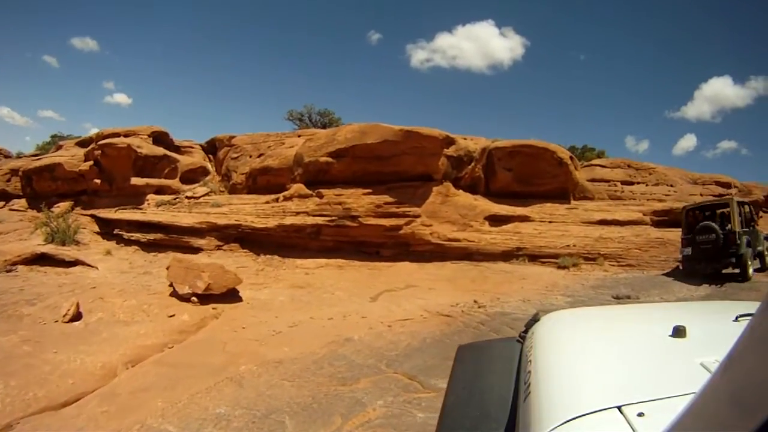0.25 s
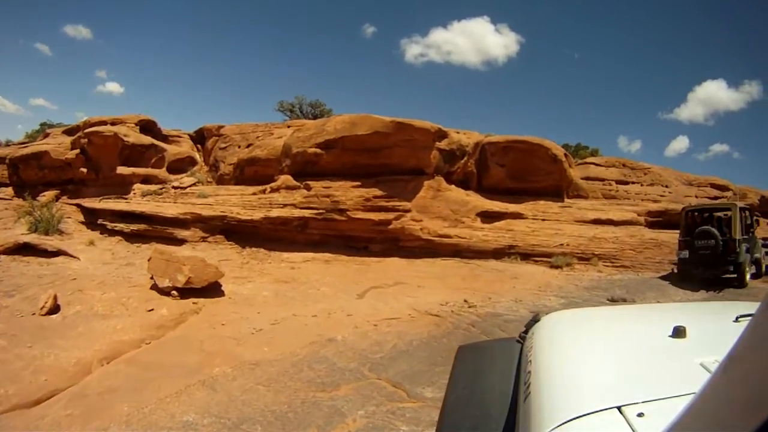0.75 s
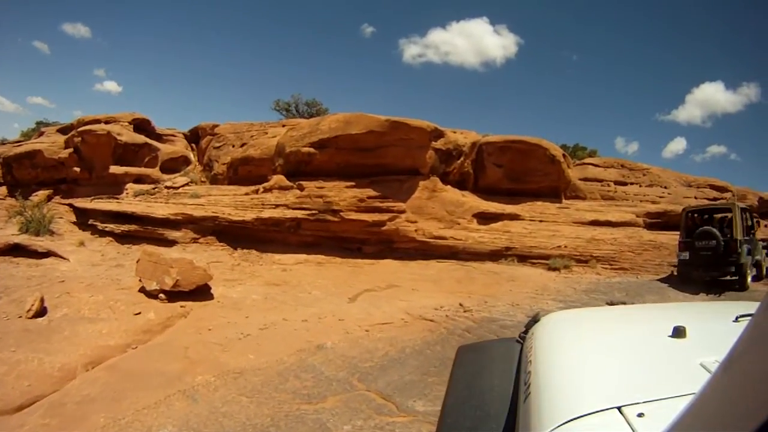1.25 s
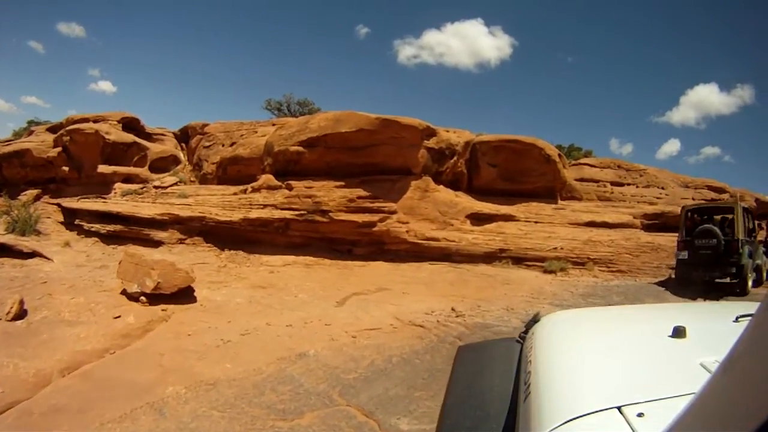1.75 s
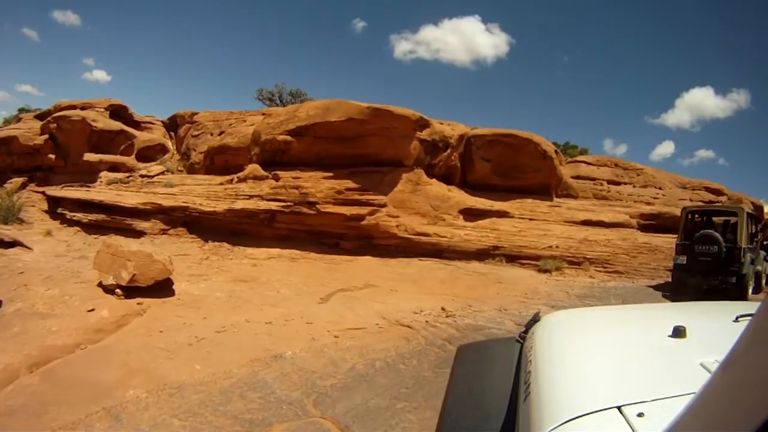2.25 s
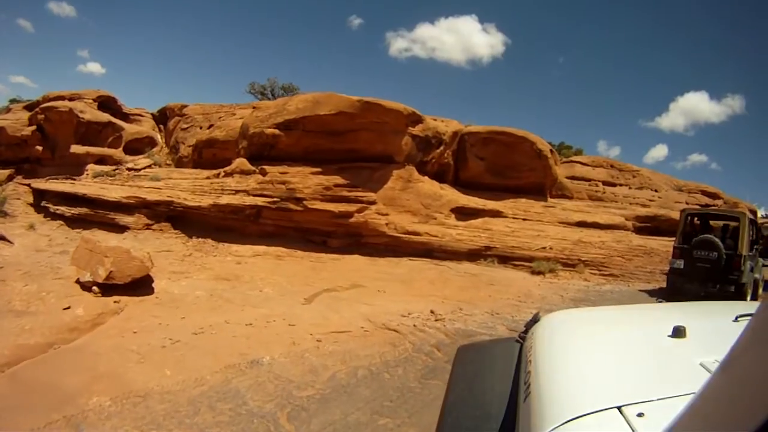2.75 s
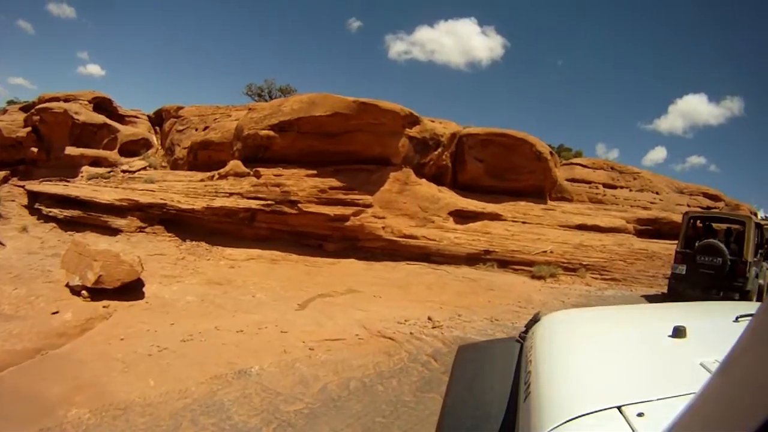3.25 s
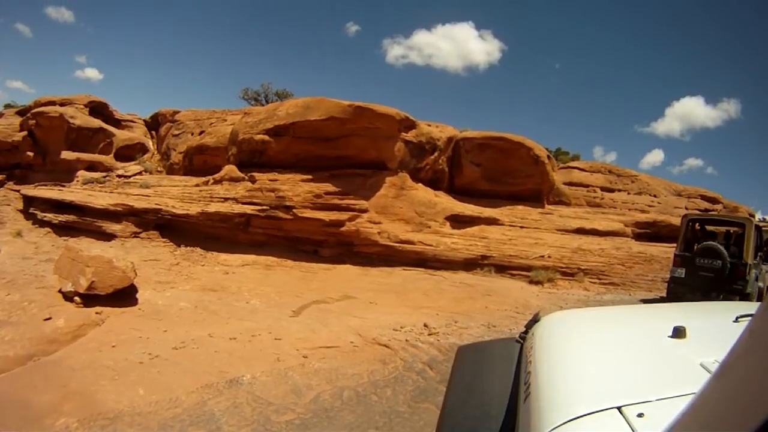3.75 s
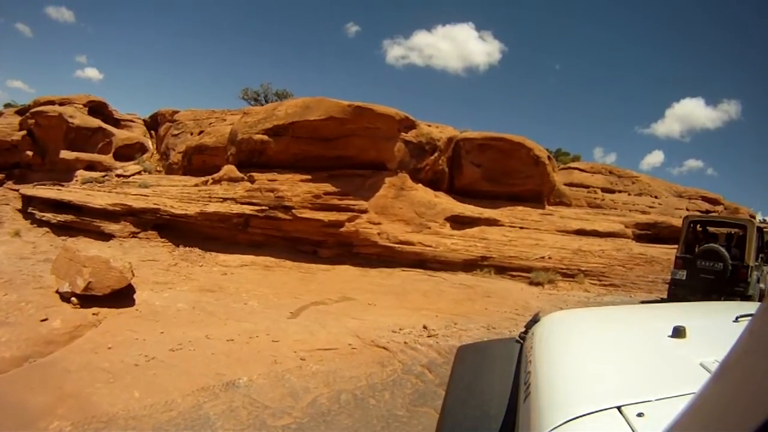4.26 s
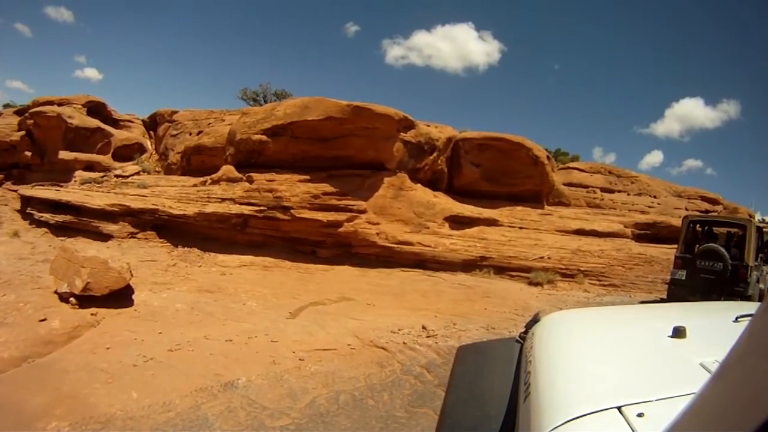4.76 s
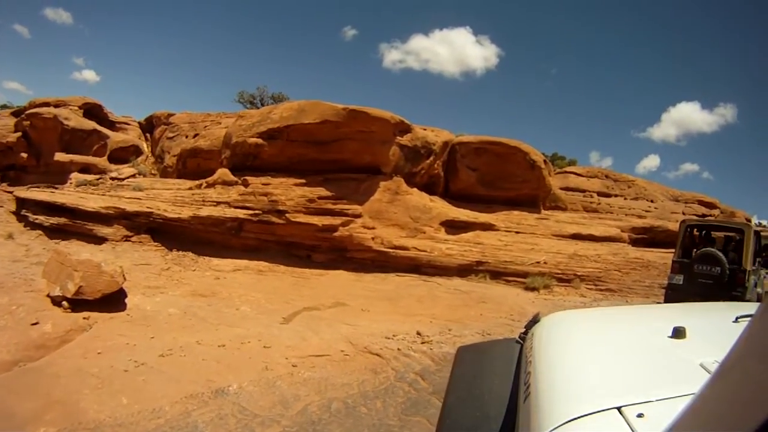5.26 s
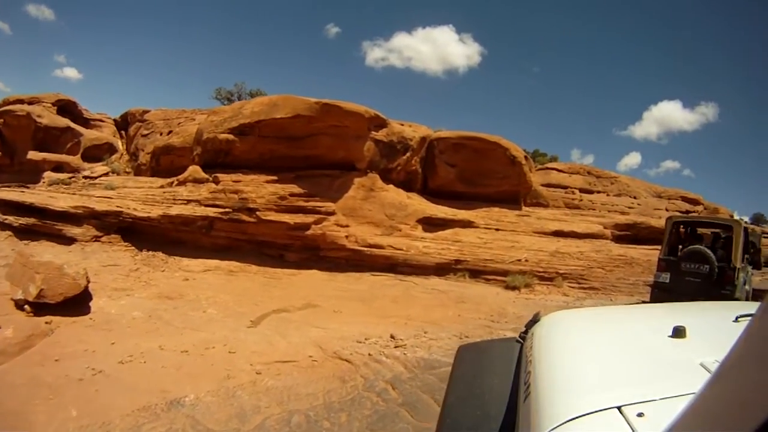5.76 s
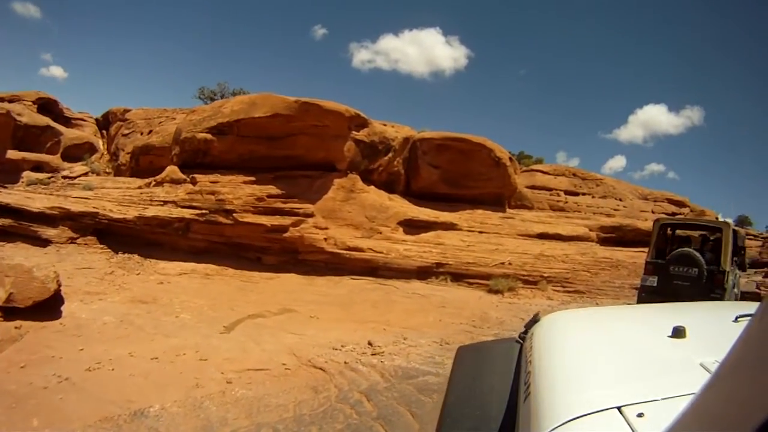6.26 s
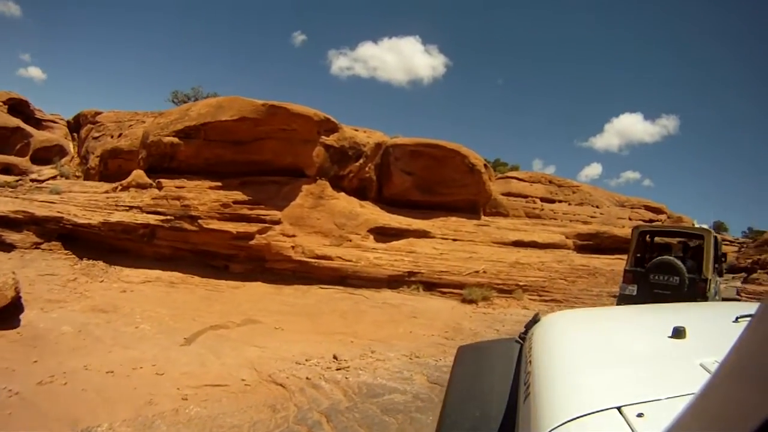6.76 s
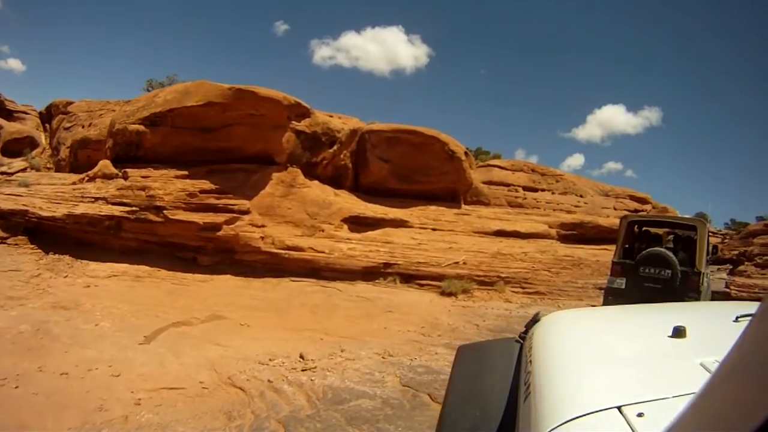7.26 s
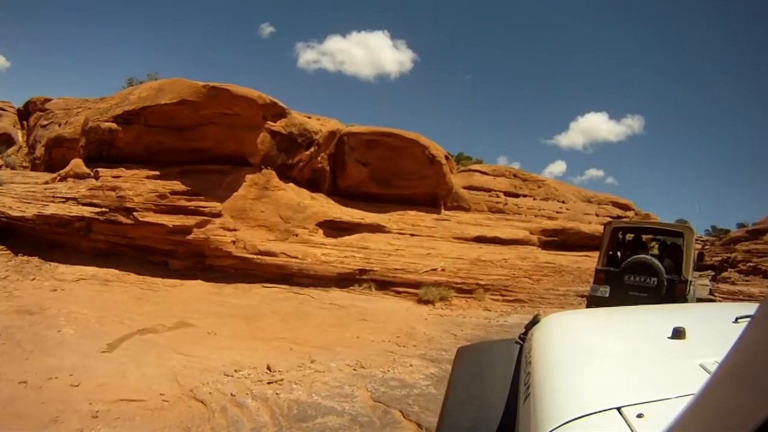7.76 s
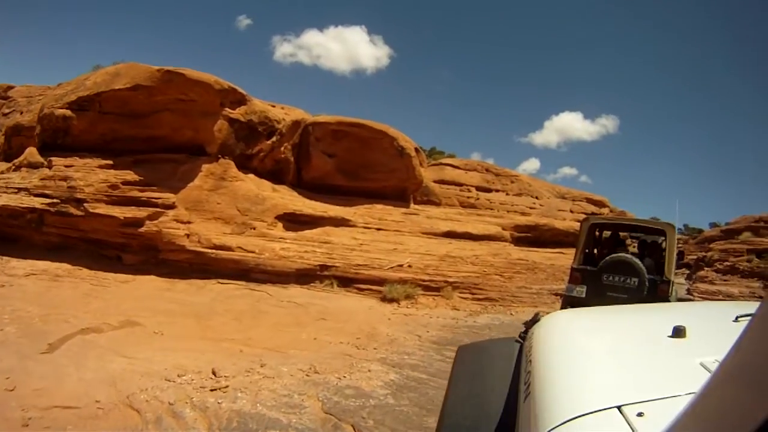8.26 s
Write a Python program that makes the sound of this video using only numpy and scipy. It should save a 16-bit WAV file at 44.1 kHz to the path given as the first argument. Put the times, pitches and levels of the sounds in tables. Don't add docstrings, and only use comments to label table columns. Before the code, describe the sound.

Muffled low rumble dominates: engine pulses around 45 hertz, rising and falling unevenly as the car lurches. A brief high rubber squeak opens, a click and creak follow around 1.5 seconds, and sparse ticks continue. From about 6 seconds, heavier throbbing jolts, low gear moan and deep gusts crowd together, then ease. Faint hiss and gritty tyre scrub sit far behind. Close body-mounted microphone outdoors, boxy and without reverberation.

```python
import sys
import numpy as np
from scipy import signal
from scipy.fft import rfft, irfft, next_fast_len
from scipy.io import wavfile
from scipy.ndimage import uniform_filter1d

SR = 44100
rng = np.random.default_rng(int(sys.argv[2]) if len(sys.argv) > 2 else 0)


def level_to_linear(level):
    exponent = np.asarray(level, float) / 20
    return 10 ** exponent


def log_audio(samples):
    frames = np.atleast_2d(samples).T
    limited = np.clip(frames, -1, 1)
    pcm = np.round(limited * 32767).astype(np.int16)
    wavfile.write(sys.argv[1], SR, pcm)


N = 375732
T = np.arange(N) / SR
FFT_SIZE = next_fast_len(N)

# time_s, pitch_hz
FIRING = [(0, 48.27), (.45, 44.84), (.8, 43.44), (1.1, 45.4), (1.35, 45.93), (1.6, 47.15), (1.95, 46.64),
          (2.3, 43.97), (2.9, 45.15), (3.1, 44.16), (3.3, 40.9), (3.7, 41.3), (4.0, 42.33), (4.3, 43.92),
          (4.5, 41.07), (4.73, 41.26), (4.94, 45.35), (5.05, 45.86), (5.25, 46.2), (5.75, 50.3), (6, 45.7),
          (8.52, 46.21)]
# peak_s, level_db, rise_s, fall_s
LURCHES = [(0.0, -38, .1, 0.32), (0.47, -31, 0.27, 0.21), (1.3, -28.5, 0.74, 0.27), (1.56, -36, .06, .08),
           (1.78, -42.5, 0.75, 0.19), (2.1, -33, 0.25, 0.46), (2.92, -28, 0.66, 0.44),
           (3.34, -36.5, 0.09, 0.1), (3.55, -36, 0.14, 0.2), (3.94, -32, 0.25, 0.22),
           (4.27, -30, 0.28, .25), (4.58, -37, 0.094, 0.18), (4.95, -27, 0.2, 0.27),
           (5.17, -31, 0.083, 0.21), (5.8, -36.5, 0.075, 0.082), (6.07, -30, 0.2, 0.16),
           (6.32, -25.5, 0.27, 0.18), (6.52, -27.5, 0.096, 0.086), (6.9, -37.5, 0.19, 0.16),
           (7.13, -45, 0.073, 0.062), (7.4, -30, 0.22, 0.15), (8.24, -37, 0.089, 0.099),
           (8.5, -39.5, 0.058, .1)]
# multiple_of_firing, climbing_db, over_the_ledge_db
BOOM_MULTIPLES = [(1.56, -24, -22), (3, -28, -28), (3.5, -42, -60), (4.3, -30, -44), (5, -31, -34.5),
                  (7.1, -41, -44.5)]
# centre_s, depth_db, half_length_s
SLACK_DIPS = [(0.102, -9.5, 0.054), (0.673, -28, 0.054), (1.68, -11, 0.04), (1.807, -5, 0.035),
              (3.22, -15, 0.086), (3.435, -18, 0.049), (5.114, -9, 0.027), (5.742, -11, 0.029),
              (5.87, -10, 0.032), (6.408, -9, .015), (7.046, -18.5, 0.017), (7.762, -11, .04),
              (8.28, -2, 0.05)]
# peak_s, level_db, rise_s, fall_s
LOW_JOLTS = [
    (0.0, -40.5, .1, 0.11),
    (.35, -69, 0.085, 0.29),
    (5.36, -27, 0.27, 0.44),
    (6.46, -25.5, 0.042, 0.063),
    (6.78, -29, 0.056, 0.079),
    (7.0, -28.5, 0.063, 0.059),
    (7.6, -25.5, 0.095, 0.11),
    (7.84, -31.5, 0.038, 0.042),
    (8.22, -44, 0.061, 0.097),
]
# peak_s, level_db, rise_s, fall_s
HIGH_JOLTS = [(.15, -47, .15, .12), (.85, -48, .1, .1), (3.35, -48, .1, .12), (.33, -40.5, 0.063, 0.17),
              (1.14, -49, 0.06, .05), (2.95, -47, 0.2, 0.29), (4.22, -48, 0.1, 0.2), (6.2, -39, 0.23, .3),
              (6.67, -24.5, 0.077, 0.061), (6.89, -26, 0.058, 0.061), (7.12, -34, 0.06, 0.06),
              (7.71, -36, 0.033, 0.079), (7.89, -27, 0.062, 0.089), (8.041, -29, 0.1, 0.17),
              (8.41, -29.5, 0.039, 0.057)]
# time_s, above_rest_hz
HIGH_MODE_LIFT = [(6.0, 0), (6.15, 5), (6.4, 0), (8.25, 0), (8.35, 7)]
# time_s, pitch_hz
MOAN_PITCH = [(1.5, 161), (2, 155.2), (4.5, 119.7), (4.8, 124.5), (5.2, 110.6), (5.48, 124.2),
              (5.81, 149.2), (6, 141.8), (6.8, 150.9), (7.15, 149.7), (7.4, 139.2), (7.75, 134.2),
              (7.95, 147.6), (8.52, 151.3)]
# peak_s, level_db, rise_s, fall_s
MOAN_SWELLS = [
    (1.65, -69, 0.21, 0.29),
    (4.62, -69, .15, 0.12),
    (5.35, -57, 0.088, 0.082),
    (5.81, -55, 0.3, 0.22),
    (6.1, -66, .15, 0.46),
    (6.72, -52, 0.07, 0.064),
    (7.15, -50.5, 0.34, 0.36),
    (7.59, -55, 0.18, .12),
    (7.92, -58.5, 0.19, 0.21),
    (8.5, -55.5, 0.2, .1),
]
# centre_s, level_db, pitch_hz, half_length_s
SQUEAK = [(0.118, -47, 1615, 0.0093), (0.134, -52, 1670, 0.016), (0.152, -47, 1646, 0.022),
          (.168, -58, 1587, .01), (.183, -48, 1664, 0.019), (0.202, -42.5, 1620, 0.025),
          (.22, -45, 1573, 0.015), (0.238, -40.5, 1592, 0.014), (0.259, -47.5, 1630, 0.014),
          (.277, -54.5, 1597, 0.017), (0.295, -65, 1594, 0.018), (0.324, -65, 1574, 0.016),
          (0.35, -62, 1600, 0.016), (.375, -69, 1590, 0.022), (0.397, -63, 1735, 0.02),
          (0.419, -49.5, 1656, 0.02), (.455, -69, 1665, 0.036), (.49, -71, 1650, .025)]
# centre_s, level_db, pitch_hz, half_length_s
SQUEAK_TIGHT = [
    (0.136, -61, 3380, 0.034),
    (0.169, -60, 3430, 0.018),
    (.19, -61.5, 3350, 0.018),
    (0.209, -58, 3430, 0.011),
    (0.225, -60, 3380, .014),
    (0.407, -59.5, 3400, 0.024),
]
# centre_s, level_db, pitch_hz, half_length_s
SQUEAK_SLACK = [
    (.208, -59, 3016, 0.015),
    (.222, -57, 3280, 0.021),
    (0.238, -50.5, 3090, 0.01),
    (.253, -59, 3170, 0.014),
    (.275, -66, 3150, 0.015),
    (.293, -67, 3170, .014),
    (.308, -70, 3100, .008),
]
# centre_s, level_db, voice_hz, half_length_s
TIGHT_OVERTONE_SLIPS = [
    (.165, -65, 3410, 0.029),
    (.207, -63, 3450, .011),
]
# centre_s, level_db
PIPS = [(0.325, -64), (0.428, -61.5), (2.348, -63), (2.578, -59.5), (2.781, -67), (2.845, -52), (2.93, -64),
        (4.945, -67), (6.353, -69), (6.501, -69), (7.137, -63.5), (7.807, -65)]
# centre_s, level_db, pitch_hz, half_length_s
CREAKS = [(.21, -49, 1473, .012), (0.21, -60, 1950, 0.0089), (0.225, -67, 3680, .01),
          (0.368, -72, 2460, .022), (1.521, -53, 1035, 0.0056), (1.525, -62.5, 3070, 0.025),
          (1.515, -60, 3000, .005), (1.539, -58, 1006, 0.016), (2.062, -70.5, 3710, 0.02),
          (2.144, -73, 3680, 0.03), (2.435, -67, 2132, 0.016), (4.392, -74, 3720, 0.048),
          (4.439, -70, 1503, 0.03), (4.573, -66.5, 1580, 0.044), (4.752, -63, 1560, 0.012),
          (4.768, -70, 1954, 0.035), (5.036, -75, 1545, .026), (5.269, -71, 1538, 0.029),
          (6.63, -64, 1080, 0.017), (0.168, -72, 2430, .02), (0.314, -71, 2280, .015),
          (.385, -69, 2410, .015), (.41, -68, 2190, 0.019), (.402, -73, 5200, .012),
          (1.553, -60, 1074, .015), (1.572, -67, 1031, .02), (4.28, -68, 1530, 0.046),
          (4.75, -66, 1340, 0.013), (4.78, -69, 1910, 0.02), (4.758, -71, 3500, .012),
          (4.79, -71, 4100, .015), (4.295, -70, 3750, .015), (2.86, -69.5, 1080, 0.044),
          (2.57, -68, 2300, .012)]
# time_s, scrub_db
SCRUB = [(0, -68), (.6, -74), (1.7, -72), (2.5, -73), (3.1, -70), (3.7, -74), (4.2, -73.5), (4.65, -67),
         (4.85, -69.5), (5, -65), (5.2, -68), (5.9, -68.5), (6.5, -65.5), (7.2, -66.5), (7.85, -64.5),
         (8.1, -68), (8.52, -70.5)]
# pitch_hz, width_hz, level_db
SHELL_MODES = [(1538, 110, -7.5), (1947, 95, -5), (2200, 176, -0.5), (2474, 156, -3.5), (3073, 100, -10),
               (3430, 200, -15.5), (3700, 133, -9.5)]
# start_s, level_db, decay_s, panel_share_db
KNOCKS = [(1.512, -58.5, 0.09, -5), (2.563, -61, 0.03, -1), (2.822, -62, 0.027, -10),
          (3.227, -60, 0.034, -6), (3.295, -66, 0.083, 3), (4.264, -60, 0.2, -9),
          (4.748, -61.5, 0.13, -6.5), (5.736, -60, 0.035, -12), (5.87, -63, 0.059, -3),
          (6.021, -68, 0.044, -8), (6.659, -67, 0.07, 2), (7.03, -72, 0.075, 4), (7.08, -67.5, 0.095, 4),
          (7.3, -78, 0.041, -7), (7.84, -79, 0.05, 0), (7.964, -64, 0.039, -10)]
# peak_s, level_db, rise_s, fall_s
PANEL_RATTLES = [
    (6.5, -79.5, 0.31, .15),
    (6.95, -70, .2, 0.24),
    (7.5, -71.5, 0.59, 0.46),
]
# start_s, peak_db, pitch_hz
TICKS = [(1.5124, -52, 1900), (1.5194, -55, 2080), (1.5379, -49, 2300), (1.5484, -51, 2280),
         (4.2642, -51, 2420), (4.2794, -58, 2168), (4.2944, -46, 2160), (4.3264, -47, 2101),
         (4.7486, -60, 2130), (4.7644, -52, 2236), (4.7844, -48, 2280), (4.9267, -49, 2255),
         (5.3732, -48, 2291), (6.3704, -46, 2260), (6.4921, -54.5, 2250), (6.573, -54, 2466),
         (6.5979, -52, 2033), (6.6149, -54, 2000), (6.6583, -50, 2470), (6.6882, -48, 2160),
         (6.7024, -56, 2150), (7.0424, -53, 2191), (7.0843, -51, 2230), (7.4021, -56, 2170),
         (7.5537, -48, 2200), (7.637, -58, 2250), (7.7544, -54, 2240), (7.7917, -52, 2200),
         (7.8336, -52, 2260), (7.8835, -53, 2150), (7.9648, -54, 2405), (8.1544, -47, 2169)]
# start_s, peak_db, pitch_hz
PANEL_TICKS = [
    (1.518, -57, 1035),
    (6.6585, -47, 1075),
    (7.018, -58, 1090),
    (8.16, -61, 1110),
]
# peak_s, level_db, rise_s, fall_s
THUDS = [(3.3, -62, .08, .25), (5.2, -63, .08, .1), (8.3, -64, .1, .15), (.33, -61, 0.037, 0.074),
         (1.95, -65, .08, 0.084), (6.0, -58, 0.042, 0.11), (.45, -67, .04, 0.069), (1.15, -60, .06, 0.14),
         (2.86, -59, .05, 0.072), (4.92, -59, 0.073, .1), (6.22, -60, 0.094, 0.11), (6.47, -62, .06, 0.076),
         (7.46, -64, 0.045, 0.062), (7.6, -73, .08, .15)]
# centre_s, level_db,
# pitch_hz, half_length_s
LOW_TONES = [(.32, -51, 105, .045), (6.45, -55, 105, .07), (.325, -54, 184, .035), (.33, -54, 140, 0.06),
             (.44, -60, 195, .04), (4.92, -60, 227, .08), (4.92, -63.5, 320, .08), (6.1, -61, 224.7, 0.13),
             (7.33, -67, 230, .07), (7.92, -58, 155, .05), (6.7, -56, 150, .04), (6.86, -61, 195, .07),
             (6.3, -61, 175, .08), (1.53, -64, 290, .04), (.8, -66, 335, .04), (2.35, -66, 330, .03),
             (4.05, -67, 325, .06), (3.27, -65, 270, .04), (2.92, -66, 340, .02)]
# centre_s, level_db, pitch_hz, half_length_s
BOUNCE = [
    (3.4, -35.5, 13.17, 0.28),
]
# start_s, length_s, start_hz, climb_hz_per_s, level_db
WHINES = [
    (5.4, .4, 1990, 1400, -75.5),
    (4.35, .08, 3500, 4500, -73),
    (8.17, .24, 1985, -230, -72.5),
    (7.15, .2, 2140, -250, -73),
    (7.68, .2, 2220, 0, -71),
    (7.34, .07, 1060, -200, -69),
    (7.54, .12, 1085, 30, -68),
    (5.52, .16, 368, -170, -67),
]
# pitch_hz, level_db_per_hz
WIND_COLOUR = [(47, -34), (76, -5), (90, -17), (113, -15), (173, -14), (280, -25), (339, -25), (433, -31.5),
               (700, -35.5), (910, -56), (1540, -120)]
# peak_s, level_db, rise_s, fall_s
GUSTS = [
    (2.55, -54, .2, .2),
    (3.06, -52, .1, .15),
    (3.35, -53, 0.17, .2),
    (5.8, -54, .2, 0.15),
    (6.22, -38, .1, .08),
    (6.49, -32, 0.13, 0.11),
    (6.9, -43, 0.5, .25),
    (7.43, -42, 0.16, 0.26),
    (7.85, -42.5, 0.23, 0.42),
    (8.42, -40, .1, 0.088),
]
# pitch_hz, level_db_per_hz
HISS_COLOUR = [(150, -43), (250, -3.5), (459, -11), (770, -10.5), (976, -13.5), (1090, -13), (1360, -15.5),
               (2340, -20.5), (2670, -20), (5170, -21.5), (5900, -28.5), (7670, -72), (13000, -120)]
# from_hz, to_hz, share_of_time_kept
FAINT_BANDS = [(12800, 13900, .45), (13900, 14700, .75), (14700, 15400, .33)]


def rumble():
    (firing_hz,) = curves(FIRING)
    boom_db = swells(LURCHES, rest_db=-42.5)
    full_db = -28
    strain_db = 1.34 * (boom_db - full_db)
    strain_db = strain_db - 6 * ((T > 5.03) & (T < 5.9))
    over_ledge = T > 4.6
    multiples = np.zeros(N)
    for multiple, climbing_db, over_db in BOOM_MULTIPLES:
        db = full_db + np.where(over_ledge, over_db, climbing_db) + strain_db + 2.3 * walk(5)
        multiples += tone(multiple * firing_hz, db, waver=0.0045)
    low_mode = body_mode(LOW_JOLTS, 57.5, rest_db=-54.5, width_hz=10.8)
    high_mode = body_mode(HIGH_JOLTS, 64.7, rest_db=-53, width_hz=12.6, lift_hz=curves(HIGH_MODE_LIFT)[0])
    boom = tone(firing_hz, boom_db, waver=0.0083)
    moan_db = swells(MOAN_SWELLS, rest_db=-90) + 2.2 * walk(12)
    moan = tone(curves(MOAN_PITCH)[0], moan_db, waver=0.013)
    return slack_gain() * (boom + multiples + low_mode + high_mode) + moan


def body_mode(jolts, hz, rest_db, width_hz, lift_hz=0):
    db = swells(jolts, rest_db + 3.5 * walk(6.3))
    steady = np.clip((db + 44) / 8, 0, 1)
    hum = tone(hz + lift_hz, db, waver=0.0054)
    noisy_ring = level_to_linear(db) * rung_noise(hz, width_hz)
    return np.sqrt(steady) * hum + np.sqrt(1 - steady) * noisy_ring


def slack_gain():
    return level_to_linear(sum(db * np.clip(1 - abs(T - s) / half, 0, 1) ** 1.9 for s, db, half in SLACK_DIPS))


def mount():
    squeaks = slide(SQUEAK, rough=0.0074, rasp_db=2.5)
    squeaks += slide(SQUEAK_TIGHT, rough=0.009, rasp_db=3.5)
    squeaks += slide(SQUEAK_SLACK, rough=0.014, rasp_db=3.5)
    squeaks += slide(TIGHT_OVERTONE_SLIPS, rough=0.011, rasp_db=-4.0, multiple=1.51)
    creaks = chirps(CREAKS, rough=0.0126, rasp_db=2.5)
    pips = chirps([(s, db, 749, 0.022) for s, db in PIPS], rough=0.035, rasp_db=2.2)
    nudges = chirps([(s, db - 2.5, 345, 0.022) for s, db in PIPS], rough=0.03, rasp_db=1.4)
    return squeaks + creaks + pips + nudges


def slide(table, rough, rasp_db, multiple=1):
    s, db, hz, length = np.transpose(table)
    span = slice(int((s[0] - length[0]) * SR), int((s[-1] + length[-1]) * SR))
    t = T[span]
    grip = np.zeros(len(t))
    for centre, peak, half in zip(s, level_to_linear(db), length):
        grip += peak * np.cos(np.pi / 2 * np.clip((t - centre) / half, -1, 1)) ** 2
    pitch = multiple * np.interp(t, s, hz) * (1 + rough * walk(250.4)[span])
    rasp = level_to_linear(rasp_db * walk(201)[span])
    out = np.zeros(N)
    out[span] = np.sqrt(2) * grip * rasp * np.sin(2 * np.pi * np.cumsum(pitch) / SR)
    return out


def chirps(table, rough, rasp_db):
    out = np.zeros(N)
    wobble = np.cumsum(walk(250)) / SR
    for s, db, hz, length in table:
        span = slice(int((s - length) * SR), min(int((s + length) * SR), N))
        t = T[span] - s
        swell = np.cos(np.pi * t / length / 2) ** 2
        out[span] += np.sqrt(2) * level_to_linear(db) * swell * np.sin(2 * np.pi * hz * (t + rough * wobble[span]))
    return out * level_to_linear(rasp_db * walk(200))


def shell():
    knock, knock_panel = np.zeros(N), np.zeros(N)
    for s, db, decay, share_db in KNOCKS:
        span = slice(int(s * SR), int((s + 2 * decay) * SR))
        t = T[span] - s
        burst = level_to_linear(db) * np.clip(t / 0.0059, 0, 1) * np.exp(-np.log(1000) * t / (2 * decay))
        knock[span] += burst
        knock_panel[span] += burst * level_to_linear(share_db)
    shell_grit, panel_grit, broad_grit = rng.standard_normal((3, N))
    body = np.zeros(N)
    for k, (hz, width_hz, db) in enumerate(SHELL_MODES):
        body += (-1) ** k * level_to_linear(db) * ring(shell_grit, hz, width_hz)
    body = level(body, 0) + level(ring(broad_grit, 2800, 2600), -8)
    (scrub_db,) = curves(SCRUB)
    scrub = level_to_linear(scrub_db + 0.5 + 1.05 * walk(14))
    light_scrub_db = -74
    panel_rest_db = light_scrub_db - 9 + 1.29 * (scrub_db - light_scrub_db)
    panel_db = swells(PANEL_RATTLES, panel_rest_db) + 1.4 * walk(9.2)
    hum = level_to_linear(panel_db) * level(ring(panel_grit, 1072, 38), 0)
    panel_knocks = knock_panel * level(ring(broad_grit, 1015, 120), 0)
    return (scrub + knock) * body + hum + panel_knocks


def ticks(table, decay_s):
    out = np.zeros(N)
    t = np.arange(int(decay_s * SR)) / SR
    fade = np.exp(-np.log(1000) * t / decay_s)
    for s, db, hz in table:
        out[int(s * SR):][:len(t)] += level_to_linear(db) * np.sin(2 * np.pi * hz * t) * fade
    return out


def chassis():
    thuds = level_to_linear(swells(THUDS, rest_db=-86)) * rung_noise(213, 206)
    low_tones = chirps(LOW_TONES, rough=0.02, rasp_db=1.5)
    sway = level_to_linear(-49) * rung_noise(15.15, 6.3)
    bounce = chirps(BOUNCE, rough=0.15, rasp_db=0.9)
    return thuds + low_tones + sway + bounce


def whine():
    out = np.zeros(N)
    for s, length, hz, climb, db in WHINES:
        span = slice(int(s * SR), int((s + length) * SR))
        t = T[span] - s
        swell = np.sqrt(2 * np.sin(np.pi * t / length).clip(0))
        out[span] += swell * level_to_linear(db) * np.sin(2 * np.pi * (hz + climb * t / 2) * t)
    return out * level_to_linear(2.3 * walk(40))


def wind():
    calm_db = -53
    gust_db = swells(GUSTS, calm_db + 2.2 * walk(6))
    low_jolts = list(np.add(LOW_JOLTS, [0, -1, 0, 0]))
    shake_db = uniform_filter1d(swells(LURCHES + HIGH_JOLTS + low_jolts, rest_db=-42.5), size=4000)
    wind_db = -54.5 + 0.3 * (shake_db + 32.5) + 0.25 * (gust_db - calm_db)
    rush = level_to_linear(wind_db - 1.5 + 1.5 * walk(9)) * coloured(WIND_COLOUR, flicker_db=1.6, rate=10)
    buffet = level_to_linear(gust_db - 5.5) * rung_noise(32, 11)
    return rush + buffet


def hiss():
    return level_to_linear(-64.5) * coloured(HISS_COLOUR, flicker_db=1.05, rate=10)


def level(x, db):
    return x * level_to_linear(db) / np.sqrt(np.mean(x ** 2))


def curves(table):
    s, *columns = np.transpose(table)
    return [np.interp(T, s, c) for c in columns]


def swells(table, rest_db):
    power = level_to_linear(rest_db) ** 2 + np.zeros(N)
    for s, db, rise, fall in table:
        span = slice(max(int((s - rise) * SR), 0), int((s + fall) * SR))
        t = T[span] - s
        away = np.where(t < 0, -t / rise, t / fall)
        power[span] += (level_to_linear(db) * np.cos(np.pi / 2 * np.clip(away, 0, 1)) ** 0.93) ** 2
    return 10 * np.log10(power)


def walk(rate):
    k = int(SR / rate)
    held = np.repeat(rng.standard_normal(N // k + 1), k)
    return 1.307 * uniform_filter1d(uniform_filter1d(held, k), k)[:N]


def tone(hz, db, waver=0.01):
    phase = 2 * np.pi * np.cumsum(hz * (1 + waver * walk(12))) / SR
    return np.sqrt(2) * level_to_linear(db) * np.sin(phase)


def ring(x, hz, width_hz):
    return signal.lfilter(*signal.iirpeak(hz, hz / width_hz, fs=SR), x)


def rung_noise(hz, width_hz):
    return level(ring(ring(rng.standard_normal(N), hz, width_hz), hz, width_hz), 0)


def coloured(spectrum, flicker_db, rate):
    hz, db = np.transpose(spectrum)
    f = np.fft.rfftfreq(FFT_SIZE, 1 / SR) + 1
    noise = rfft(rng.standard_normal(N), FFT_SIZE) * level_to_linear(np.interp(np.log(f), np.log(hz), db, -90, -90))
    half_octave = np.log2(f / hz[0]) * 2
    out = np.zeros(N)
    for k in range(int(2 * np.log2(hz[-1] / hz[0])) + 2):
        band = irfft(noise * np.clip(1 - abs(half_octave - k), 0, 1), FFT_SIZE)[:N]
        out += level_to_linear(flicker_db * walk(rate)) * band
    return level(out, 0)


def scene():
    taps = level_to_linear(-6) * ticks(TICKS, decay_s=0.033) + ticks(PANEL_TICKS, decay_s=0.057)
    mix = rumble() + mount() + shell() + taps + chassis() + whine() + wind() + hiss()
    return mix[None]


def frame_db(x, frame):
    return 10 * np.log10(uniform_filter1d(x ** 2, size=2048)[::frame] + 1e-14)


def drop_faint_treble(x):
    frame = 1024
    spectrum, f = rfft(x, FFT_SIZE), np.fft.rfftfreq(FFT_SIZE, 1 / SR)
    boom_db = 0.8 * frame_db(x, frame) + 3.5 * rng.standard_normal(N // frame + 1)
    for low_hz, high_hz, share in FAINT_BANDS:
        band = irfft(spectrum * ((f >= low_hz) & (f < high_hz)), FFT_SIZE)[:N]
        margin_db = 2 * frame_db(band, frame) - boom_db
        lost = 1.0 * (margin_db < np.quantile(margin_db, 1 - share))
        x = x - band * uniform_filter1d(np.repeat(lost, frame)[:N], size=400)
    return x


def roll_off(x):
    return signal.sosfilt(signal.butter(12, 15300, fs=SR, output="sos"), x)


def record(dry):
    coarse = signal.resample_poly(dry, 40, 147, axis=1)
    held = signal.resample_poly(np.repeat(coarse, 4, axis=1), 147, 160, axis=1)
    finished = drop_faint_treble(held[0, :N])[None]
    return roll_off(finished)


dry = scene()
out = record(dry)
log_audio(out)
```